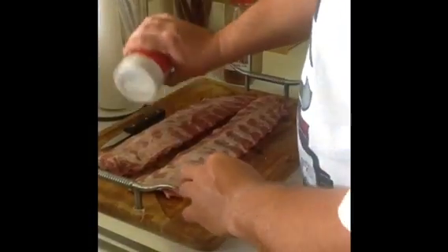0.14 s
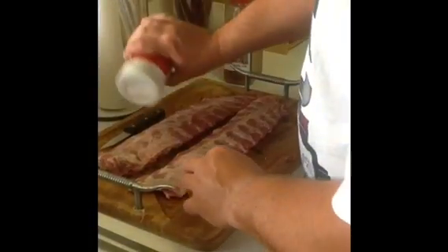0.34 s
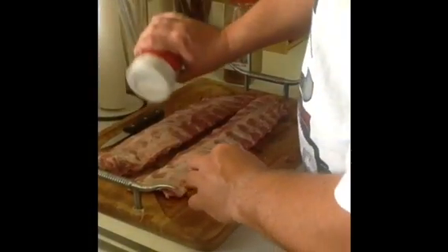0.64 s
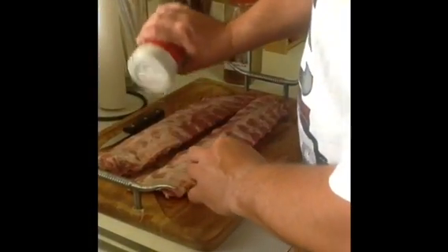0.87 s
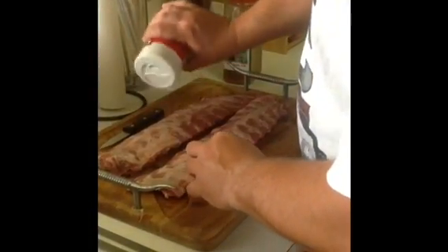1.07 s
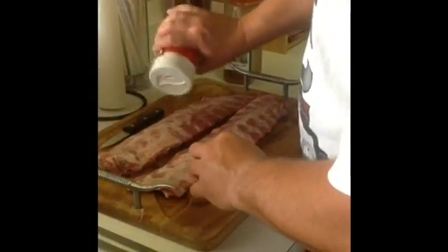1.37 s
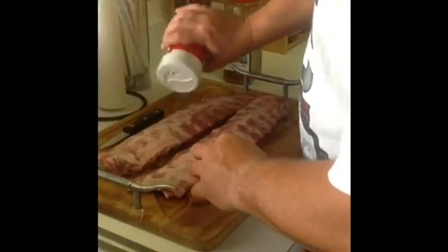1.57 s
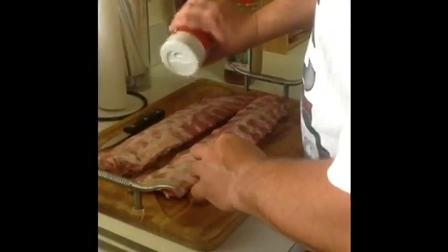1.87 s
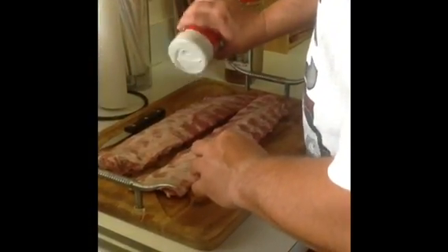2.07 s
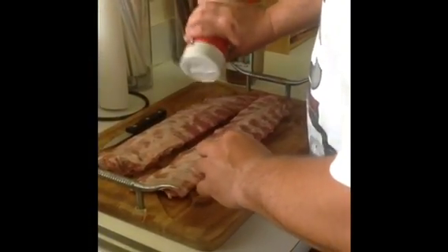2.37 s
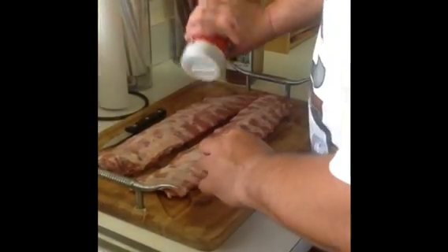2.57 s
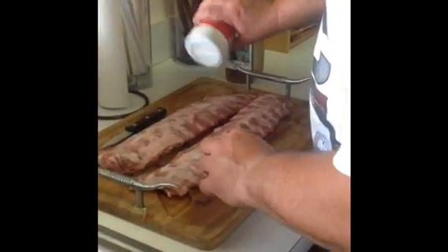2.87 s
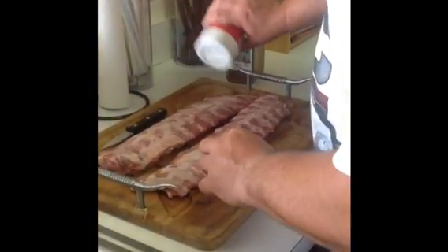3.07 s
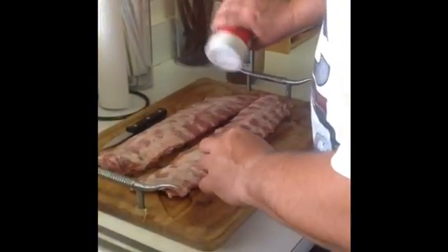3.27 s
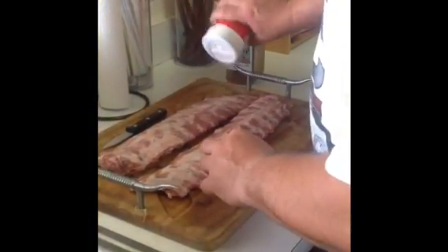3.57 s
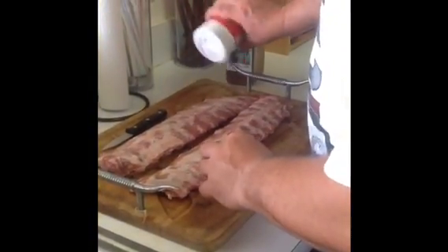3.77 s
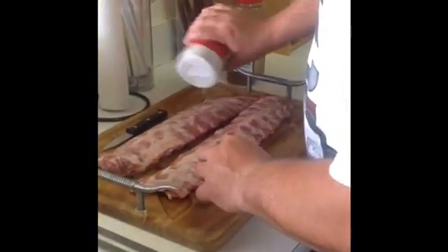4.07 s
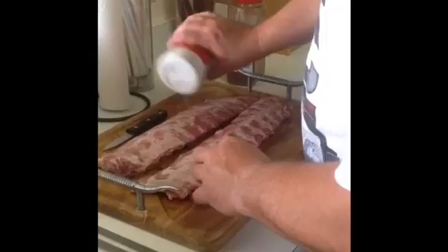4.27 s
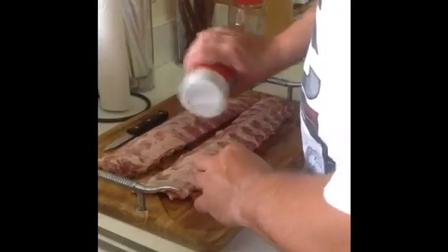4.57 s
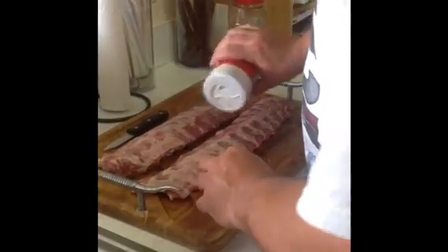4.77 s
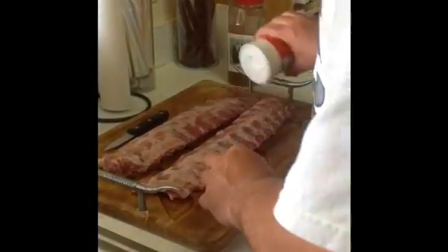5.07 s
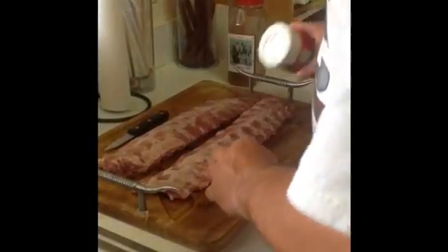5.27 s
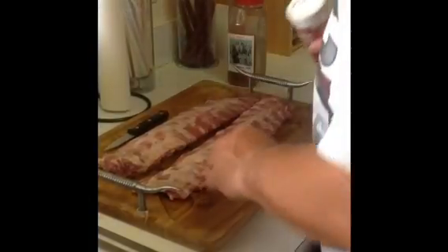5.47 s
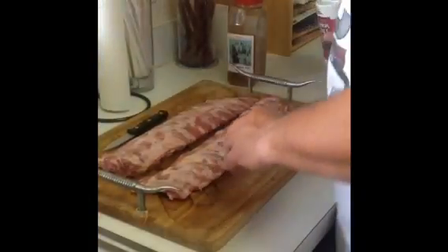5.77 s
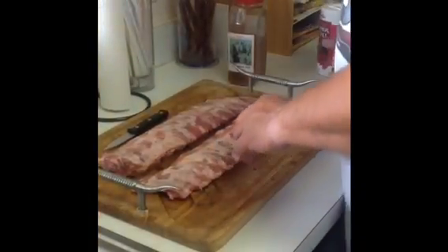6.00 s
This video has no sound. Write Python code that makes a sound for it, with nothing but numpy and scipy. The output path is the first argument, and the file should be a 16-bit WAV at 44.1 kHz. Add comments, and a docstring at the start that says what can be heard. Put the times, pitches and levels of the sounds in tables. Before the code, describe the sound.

From the very start, salt is shaken in a plastic shaker with a quick, bright, grainy rattle. The grains hit the lid and the base in turn, making about ten short hissing bursts a second, even in rhythm and slightly varied in strength. The shaking lasts until about 5.2 seconds and ends with a last flick. At 5.3 seconds the shaker bumps something hollow, giving a short, light thunk. From about 5.5 to 5.8 seconds the salt slides back inside with a soft, swelling swish. After a tiny scuff, the shaker is set down on the counter at 6 seconds with one hard knock, the loudest sound. A faint, slightly wavering appliance hum with a soft rush of air continues throughout. The small kitchen adds a short reverberation, and the sound is mono with little deep bass.

```python
"""Salting meat in a small kitchen

Over the hum of an appliance, salt sloshes from end to end of a plastic shaker about ten times a second;
its many grain impacts add up to bursts of noise and excite the resonances of the wall. The shaker then
bumps something hollow, is turned upright so that the salt slides back, and is set down hard on the
counter. Both collisions excite damped modes, and the room reverberates."""
import sys
import numpy as np
from scipy import signal
from scipy.fft import rfft, irfft, next_fast_len
from scipy.io import wavfile

SR = 44100
rng = np.random.default_rng(int(sys.argv[2]) if len(sys.argv) > 2 else 0)


def dump(signal):
    """Clip the signal to [-1, 1] and save it as 16-bit WAV at the path in sys.argv[1]."""
    limited = np.clip(np.atleast_2d(signal).T, -1, 1)
    pcm = np.round(limited * 32767).astype(np.int16)
    wavfile.write(sys.argv[1], SR, pcm)


N = 270763
TIME = np.arange(N) / SR


def gain_of(db):
    """Amplitude ratio of a level in decibels."""
    return 10 ** (np.asarray(db) / 20)


def unit_rms(x):
    """Normalisation to unit mean power."""
    return x / np.sqrt(np.mean(x ** 2) + 1e-20)


def value_at(points, hz):
    """Interpolation along a logarithmic frequency axis."""
    f, value = np.transpose(points)
    return np.interp(np.log(hz + 1), np.log(f + 1), value)


def coloured(x, spectrum):
    """Minimum-phase filtering to the given spectral shape, at unit power gain."""
    size = next_fast_len(2 * len(x))
    hz = abs(np.fft.fftfreq(size, 1 / SR))
    gain = unit_rms(gain_of(value_at(spectrum, hz)))
    response = np.exp(np.conj(signal.hilbert(np.log(gain))))
    return np.fft.ifft(np.fft.fft(x, size) * response).real[:len(x)]


def drift(rate_hz):
    """Random fluctuation: low-pass noise of unit rms."""
    hz = np.fft.rfftfreq(N, 1 / SR)
    return unit_rms(irfft(rfft(rng.standard_normal(N)) / (1 + (hz / rate_hz) ** 2), N))


# Reverberation time of the kitchen: f/Hz, T60/s
ROOM_DECAY = [(150, 0.43), (700, 0.59), (2000, 0.45), (5000, 0.44), (12000, 0.31)]
def reverberation(x, onset_s=0.0017):
    """Diffuse field: dense random reflections decay exponentially, fastest in the treble."""
    spacing = 10  # samples per reflection
    slots = np.arange(0, SR - spacing, spacing)
    taps = np.zeros(SR)
    taps[slots + rng.integers(0, spacing, len(slots))] = rng.choice([-1., 1.], len(slots))
    hz, t, spectra = signal.stft(taps, SR, nperseg=256)
    decay = gain_of(-60 * t / value_at(ROOM_DECAY, hz)[:, None])
    tail = signal.istft(spectra * decay, SR, nperseg=256)[1]
    tail *= np.clip(np.arange(len(tail)) / SR / onset_s - 1, 0, 1)
    return signal.fftconvolve(x, tail / np.linalg.norm(tail))[:N]


def moving_source(x, wet_db, sweep_hz, count=3):
    """Reflections depend on source position: their patterns cross-fade as the hand travels."""
    fades = [np.sin(np.pi * (sweep_hz * TIME + k / count)) * np.sqrt(2 / count) for k in range(count)]
    return x + gain_of(wet_db) * sum(reverberation(x * fade) for fade in fades)


# Motor partials: f/Hz, relative level/dB
MOTOR_TONES = [(120, -70.5), (199.2, -54), (231.5, -65), (290, -64.5), (317.6, -61), (349.9, -63),
               (409.1, -65.5), (464, -61.5), (522.2, -62.5), (625, -66.5), (812.9, -66.5)]
# Spectrum of the rushing air: f/Hz, relative level/dB
AIR_SPECTRUM = [(30, -24), (90, -25), (125, -19.5), (150, -8), (185, -3.5), (280, 0.5), (400, -8),
                (560, -7), (800, -11), (1100, -16.5), (2000, -22.5), (4000, -26), (9000, -29.5),
                (15500, -29)]
def appliance(hum_db, air_db, waver_hz, flutter):
    """Motor tones, randomly modulated in frequency and amplitude, lie over broadband flow noise."""
    hum = np.zeros(N)
    for hz, db in MOTOR_TONES:
        cycles = np.cumsum(hz + waver_hz * drift(4.78)) / SR + rng.random()
        amplitude = 1 + flutter * drift(6.9)
        hum += gain_of(db) * unit_rms(amplitude * np.sin(2 * np.pi * cycles))
    return gain_of(hum_db) * hum + gain_of(air_db) * coloured(rng.standard_normal(N), AIR_SPECTRUM)


def scuff(at_s, width_s, db):
    """Friction noise: the shaker scrapes briefly just before it lands."""
    hiss = coloured(rng.standard_normal(N), [(1000, -40), (3000, -0.5), (7000, 2), (15000, -9)])
    return gain_of(db) * hiss * np.exp(-((TIME - at_s) / width_s) ** 2)


def impact(blows, modes, crack, rise_s, crack_db, crack_t60, room_db, ring_room_db, salt_db, salt_t60):
    """Impulsive excitation: each blow cracks, rings damped modes, jolts the salt and excites the room."""
    ring, burst, jolt, clicks = np.zeros((4, N))
    t = TIME[:SR // 2]
    # neighbouring modes start in antiphase
    body = sum((-1) ** k * gain_of(db - 60 * t / t60) * np.sin(2 * np.pi * hz * t)
               for k, (hz, db, t60) in enumerate(modes))
    for at_s, db in blows:
        start = round(at_s * SR)
        age = t[:N - start]
        span = slice(start, start + len(age))
        attack = gain_of(db) * (1 - np.exp(-age / rise_s))
        clicks[start] = gain_of(db)
        ring[span] += attack * body[:len(age)]
        burst[span] += attack * gain_of(-60 * age / crack_t60) * rng.standard_normal(len(age))
        jolt[span] += attack * gain_of(-60 * age / salt_t60) * rng.standard_normal(len(age))
    contact = gain_of(crack_db) * coloured(burst, crack)
    rattle = gain_of(salt_db) * coloured(jolt, GRAIN_SPECTRUM)
    into_room = gain_of(room_db) * coloured(clicks, crack) + gain_of(ring_room_db) * ring
    return ring + contact + rattle + reverberation(into_room)


# Contacts with the hollow object: t/s, relative level/dB
BUMP_BLOWS = [(5.3208, 0), (5.3265, -13)]
# Modes of the air space and plastic wall: f/Hz, level/dB, T60/s
HOLLOW_MODES = [(184, -38, 0.16), (261, -29.5, 0.19), (511, -32, 0.15), (663, -37.5, 0.047),
                (844, -44, 0.11), (1640, -50, 0.044), (2030, -40, .04), (2516, -34, 0.08),
                (2820, -33, 0.037), (2990, -32.5, 0.038), (3260, -28, 0.02)]
# Spectrum of the contact noise: f/Hz, relative level/dB
BUMP_SPECTRUM = [(60, -1), (250, 0), (1000, 2.5), (1900, 1), (3000, -2), (4200, -4.5), (8000, -8.5),
                 (15000, -8.5)]
def hollow_bump():
    """Cavity and wall resonance: the shaker strikes something hollow, which vibrates freely."""
    return impact(BUMP_BLOWS, HOLLOW_MODES, BUMP_SPECTRUM, rise_s=0.00017, crack_db=-29.0,
                  crack_t60=0.029, room_db=-10.5, ring_room_db=-19, salt_db=-49, salt_t60=.08)


# The shaker lands rim first, then flat, and rocks once: t/s, relative level/dB
LANDING_BLOWS = [(5.9899, 1.5), (5.9952, -14.5), (6.0385, -17), (6.043, -12.5), (6.05, -25)]
# Modes of the counter and shaker base: f/Hz, level/dB, T60/s
LANDING_MODES = [(206, -45, 0.9), (259, -32, 0.17), (357, -36.5, 0.32), (500, -35, .2), (632, -32, 0.26),
                 (695, -27.5, 0.16), (782, -19, 0.078), (861, -30, 0.16), (972, -24, 0.04),
                 (1095, -21.5, 0.077), (1234, -17.5, .06), (1620, -26, 0.067), (1880, -22, 0.03),
                 (2230, -32, 0.03)]
# Spectrum of the contact noise: f/Hz, relative level/dB
LANDING_SPECTRUM = [(50, -7), (110, -9.5), (250, 4), (450, 1.5), (750, 9), (1200, 0), (1800, 0.5),
                    (2700, -8), (3400, -7), (4600, -15.5), (6500, -14), (9000, -14), (15000, -28)]
def counter_landing():
    """Superposition: the modal responses to successive contacts add up to one hard knock."""
    return impact(LANDING_BLOWS, LANDING_MODES, LANDING_SPECTRUM, rise_s=0.00034, crack_db=-14.5,
                  crack_t60=0.026, room_db=1.5, ring_room_db=-21, salt_db=-35, salt_t60=0.11)


def heap_power(at_s, db, width_s):
    """Gaussian power envelope of one heap of salt landing; width_s is its full width at half power."""
    return gain_of(db) ** 2 * .5 ** np.minimum((2 * (TIME - at_s) / width_s) ** 2, 60)


# Downward shakes throw the salt against the lid: t/s, relative level/dB
THROWS = [(0.09, -41.5), (0.291, -38.5), (0.477, -38.5), (0.656, -44), (0.877, -38.5), (1.067, -37),
          (1.243, -42), (1.448, -36.5), (1.653, -35.5), (1.841, -38), (2.043, -39), (2.242, -37.5),
          (2.44, -38), (2.636, -37.5), (2.822, -45), (3.021, -39), (3.198, -41.5), (3.389, -44.5),
          (3.57, -36.5), (3.75, -45), (3.958, -37.5), (4.13, -38.5), (4.302, -39.5), (4.499, -34.5),
          (4.662, -38.5), (4.846, -40), (5.028, -38.5)]
# A last upward flick tosses the salt, which lands and rebounds: t/s, relative level/dB
LAST_FLICK = [(5.146, -34.5), (5.206, -42)]
def sloshing():
    """Incoherent powers add: in each shake the salt falls to the base, then is thrown at the lid."""
    times, levels = np.transpose(THROWS)
    gaps = np.diff(times, prepend=times[0] - np.diff(times).mean())
    lift_delay_s, lift_share = .028, .423  # the wrist lifts partway between throws
    fall_times = times - gaps + lift_delay_s + lift_share * gaps
    carry = 0.12  # weight of the previous throw in a fall's level
    fall_db, fall_db_per_s = -2.5, 0.32  # falls are softer than throws, less so as time goes on
    fall_levels = levels - carry * np.diff(levels, prepend=levels[0]) + fall_db + fall_db_per_s * times
    throws = sum(heap_power(s, db, width_s=.042) for s, db in THROWS)
    falls = sum(heap_power(s, db, width_s=.037) for s, db in [*zip(fall_times, fall_levels), *LAST_FLICK])
    return throws + falls


# Resonances of the plastic shaker: f/Hz, bandwidth/Hz, relative level/dB
WALL_MODES = [(2070, 90, -16), (2360, 320, -6), (2620, 110, -13), (3140, 100, -2), (3550, 150, -6),
              (4860, 400, -13)]
def shaker_wall(ticks):
    """Forced vibration: each mode of the shaker acts as a band-pass filter on the grain impacts."""
    return sum(gain_of(db) * signal.lfilter(*signal.iirpeak(hz, hz / width, fs=SR), ticks)
               for hz, width, db in WALL_MODES)


# Salt sliding along the wall as the shaker is turned upright: t/s, relative level/dB
SLIDE_ENVELOPE = [(5.25, -54), (5.3, -50), (5.37, -63), (5.47, -64), (5.55, -49.5), (5.63, -48.5),
                  (5.755, -39), (5.8, -45.5), (5.86, -68)]
# Spectrum of grains striking plastic: f/Hz, relative level/dB
GRAIN_SPECTRUM = [(300, -43), (900, -21), (1600, -14), (2300, -9), (3200, -8), (4100, -8.5), (6000, -4.5),
                  (8300, -2), (10300, 0.5), (13000, -2), (15500, -2)]
def salt(peak_grains_per_s, spread_db, clump_db, ticks_db, trickle_db, wall_db, wall_growth):
    """Shot noise: grains strike at random, with a rate and strength set by the flow of salt."""
    flow = sloshing()
    flow += gain_of(trickle_db) ** 2 * (TIME < SLIDE_ENVELOPE[0][0])  # grains roll between strokes
    flow += gain_of(np.interp(TIME, *np.transpose(SLIDE_ENVELOPE), left=-120, right=-120)) ** 2
    flow *= gain_of(clump_db * drift(80)) ** 2  # the salt arrives in clumps
    chance = np.clip(peak_grains_per_s / SR * np.sqrt(flow / flow.max()), .02, 1)
    strength = rng.standard_normal((2, N))
    strength *= gain_of(spread_db * np.minimum(rng.exponential(1, (2, N)), 4))
    hits = rng.random((2, N)) < chance
    ticks, wall_drive = unit_rms(strength) * hits * np.sqrt(flow / chance)
    wall_drive *= (flow / flow.max()) ** ((wall_growth - 1) / 2)  # a thick heap cushions the wall
    ring = gain_of(wall_db) * shaker_wall(wall_drive)
    return gain_of(ticks_db) * coloured(ticks, GRAIN_SPECTRUM) + ring


def scene():
    """Linear superposition: the pressures of all sources add at one microphone."""
    shaker = salt(peak_grains_per_s=45000, spread_db=-0.5, clump_db=0.26, ticks_db=1.5,
                  trickle_db=-66.5, wall_db=-0.5, wall_growth=0.97)
    knocks = hollow_bump() + counter_landing()
    shaker += scuff(at_s=5.911, width_s=0.0049, db=-51.0)
    mono = moving_source(shaker, wet_db=-7.5, sweep_hz=1.328) + knocks
    mono += appliance(hum_db=-1, air_db=-51.5, waver_hz=1.77, flutter=0.4)
    return np.array([mono, mono])


def record(dry):
    """Band limiting: a small microphone loses the bass, and a steep low-pass removes the top treble."""
    low_cut_hz, high_cut_hz = 115, 15350
    thin = signal.sosfilt(signal.butter(2, low_cut_hz, "highpass", fs=SR, output="sos"), dry)
    low_pass = signal.firwin(511, high_cut_hz, window=("kaiser", 9), fs=SR)
    return signal.oaconvolve(thin, low_pass[None], "same")


dry = scene()
out = record(dry)
dump(out)
```